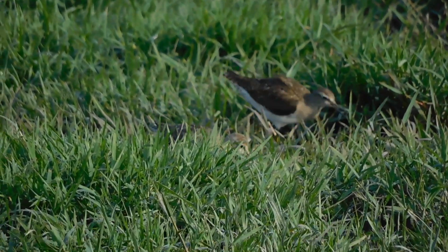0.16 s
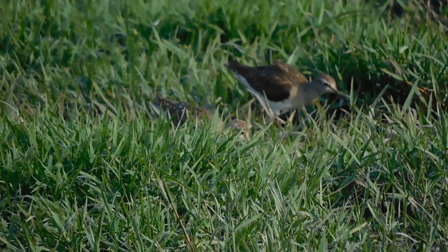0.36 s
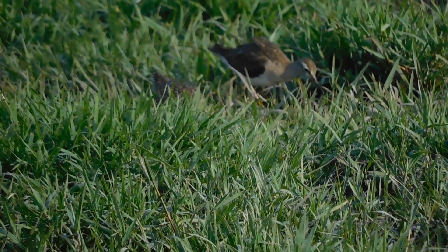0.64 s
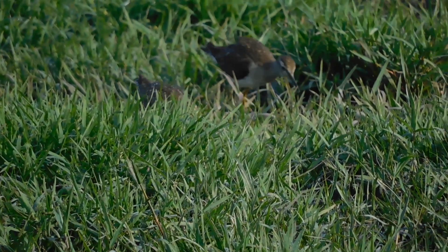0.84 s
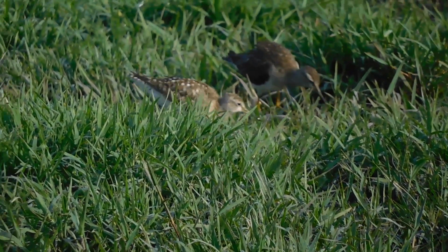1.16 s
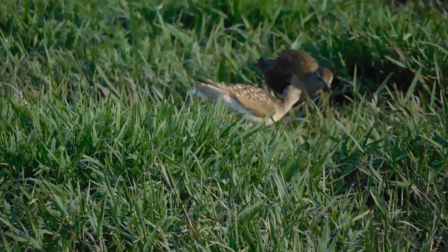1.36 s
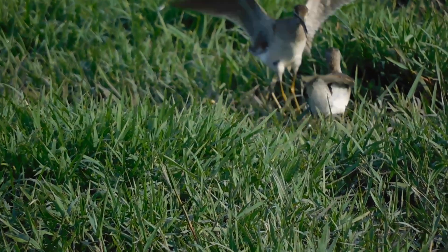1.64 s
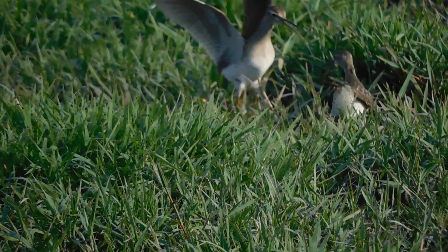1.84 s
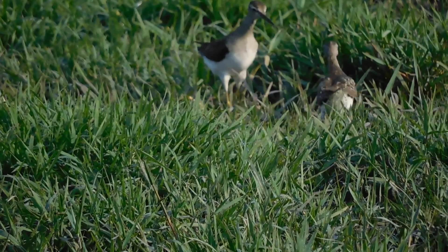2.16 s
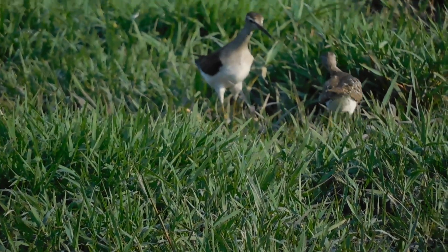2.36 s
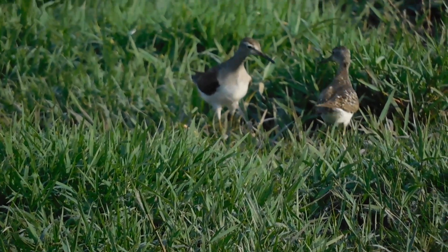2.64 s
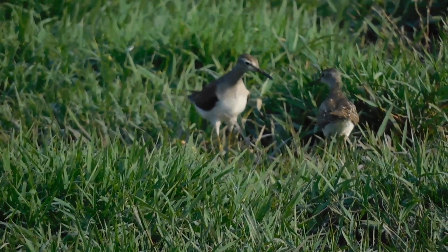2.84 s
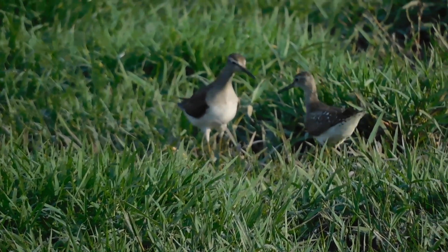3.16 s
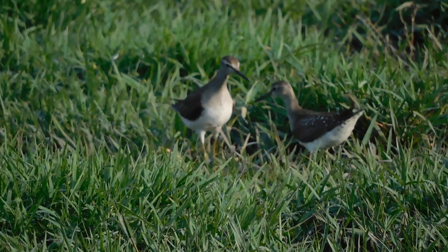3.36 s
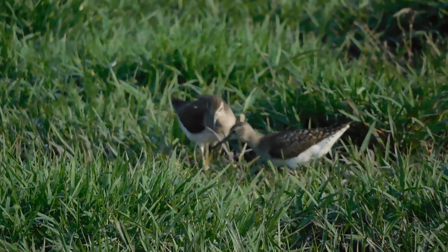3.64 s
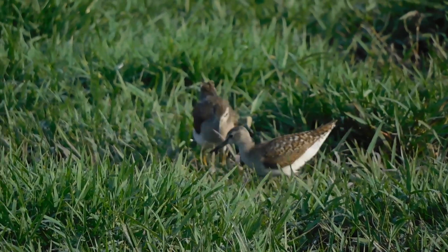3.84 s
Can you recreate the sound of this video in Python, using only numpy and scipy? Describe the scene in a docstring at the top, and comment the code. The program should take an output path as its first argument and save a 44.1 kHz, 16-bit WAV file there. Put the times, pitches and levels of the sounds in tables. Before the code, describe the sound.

Rough wind blasts overload an outdoor stereo microphone at first, then subside. Faint quick bird phrases and a whistling trill, long then short, remain over a far engine hum, followed by one squeak and a falling chirp.

```python
"""Gusts buffet two microphone ports on open grassland, then die away to leave far traffic and an engine's hum.
A small distant bird repeats one quick phrase; a two-toned, whistle-like trill sounds long, then short.
Near the end, over a blur of far-off birds, a closer one squeaks once and another gives a falling chirp.
Wind, roar, hiss and blur are filtered noise or impulses; hum and calls are sines of wavering frequency."""
import sys
import numpy as np
from scipy import signal
from scipy.fft import rfft, irfft
from scipy.io import wavfile
from scipy.ndimage import uniform_filter1d, map_coordinates

SR = 44100
rng = np.random.default_rng(int(sys.argv[2]) if len(sys.argv) > 2 else 0)


def transcribe(u):
    """Save the signal u as a 16-bit wav file named by the first command-line argument.

    u: samples, shape (n,) or (channels, n), limited to [-1, 1]; the rate is SR.
    q: integer samples, one column per channel.
    """
    v = np.clip(np.atleast_2d(u).T, -1, 1)
    q = np.round(v * 32767).astype(np.int16)
    wavfile.write(sys.argv[1], SR, q)


N = 176400

GUST_REF_DB, CALM_DB = -19.5, -77
EDDIES_PER_S = 900
RUMBLE_DB, BUFFET_DB, FIZZ_DB = -24, -21, -60.5  # at the reference gust
RUMBLE_GROWTH, BUFFET_GROWTH, FIZZ_GROWTH = 0.46, 1.11, 0.79  # dB per dB of gust
FIZZ_FLICKER_DB = 3.5
WIND_CEILING = 0.8  # of full scale
ENGINE_HZ = 48.2
HISS_DB = -59
SONG_LAG_S, TRILL_LAG_S, SQUEAK_LAG_S = 0.000037, 0.000019, -0.000078  # right port behind left
SONG_SCATTER_DB, SONG_ECHO_DB = -8, -9
TRILL_SCATTER_DB, TRILL_ECHO_DB = -14, -23
SQUEAK_SCATTER_DB, SQUEAK_ECHO_DB = -15, -17
SCATTER_S, FIELD_T60_S = 0.016, 1  # 1/e time of the scatter, 60 dB decay time of the echo
NOTE_EDGE_S, RELEASE_RATIO = 0.008, 1.6  # attack time, release over attack
PHRASE_VARY_DB = 1.5
TRILL_SIDEBAND_DB = -12
SQUEAK_HISS_DB = -7.5  # relative to the reed
EDGE_HZ = 15850


def amp(db):
    """Level law: 20 dB is a factor of ten in amplitude."""
    return 10 ** (np.asarray(db) / 20)


def unit(x):
    """Normalisation to a root-mean-square of 1."""
    return x / np.sqrt(np.mean(x ** 2) + 1e-20)


def curve(points):
    """Linear interpolation through (s, value), for every sample."""
    return np.interp(np.arange(N) / SR, *np.transpose(points))


def by_hz(points):
    """Interpolation through (Hz, value) on a logarithmic frequency axis, for every bin."""
    f, value = np.transpose(points)
    bins_hz = np.fft.rfftfreq(N, 1 / SR)
    return np.interp(np.log(bins_hz + 1), np.log(f + 1), value)


def colour(x, spectrum):
    """Linear filtering by (Hz, dB) points, scaled to keep the power of white noise."""
    return irfft(rfft(x) * unit(amp(by_hz(spectrum))), N)


def wander(count, rate_hz):
    """Low-passed noise: a smooth random fluctuation, of rms 1 over the whole scene."""
    f = np.fft.rfftfreq(N, 1 / SR)
    low_pass = np.exp(-(f / rate_hz) ** 2)
    return unit(irfft(rfft(rng.standard_normal(N)) * low_pass, N))[:count]


def add(mix, s, sound):
    """Superposition of a sound starting at s seconds, cropped to the mix."""
    at = round(s * SR)
    part = mix[max(at, 0):][:max(len(sound) + min(at, 0), 0)]
    part += sound[max(-at, 0):][:len(part)]


def fade(count, edge_s):
    """Amplitude envelope: soft attack, hold, softer release."""
    t = np.arange(count) / SR
    nearest_edge = np.minimum(t, (t[-1] - t) / RELEASE_RATIO)
    return np.sin(np.pi / 2 * np.clip(nearest_edge / edge_s, 0, 1))


def turns(hz):
    """Phase in radians as the running integral of frequency."""
    return 2 * np.pi * np.cumsum(hz) / SR


def place(x, lag_s, left_db, scatter_db, echo_db):
    """Direction by arrival time and level, with quick ground scatter and a long exponential field echo."""
    f = np.fft.rfftfreq(N, 1 / SR)
    late = irfft(rfft(x) * np.exp(-2j * np.pi * f * lag_s), N)
    direct = np.array([x * amp(left_db / 2), late * amp(-left_db / 2)])
    t = np.arange(SR // 2) / SR
    decays = np.array([np.exp(-t / SCATTER_S), np.exp(-np.log(1000) * t / FIELD_T60_S)])
    tails = rng.standard_normal((2, 2, len(t))) * decays[:, None]  # scatter or echo, port, time
    tails /= np.linalg.norm(tails, axis=2, keepdims=True)
    response = amp(scatter_db) * tails[0] + amp(echo_db) * tails[1]
    return direct + signal.fftconvolve(x[None], response, axes=1)[:, :N]


def eddy_impulses(size_db=3):
    """Shot noise: eddies of random sign and size arrive at random instants."""
    arrivals = rng.random(N) < EDDIES_PER_S / SR
    signs = rng.choice([-1, 1], N)
    return unit(arrivals * signs * amp(size_db * rng.standard_normal(N)))


def wind_port(flutter_db=3, flutter_hz=35):
    """Turbulent pressure at one port: faster air raises its pitch and strong gusts bring a flickering fizz."""
    # Gust strength. Each row: time in seconds, level in dB.
    gust_levels = [(0.0, -42), (0.05, -24), (0.08, -36), (0.1, -18), (0.2, -27), (0.22, -27), (0.25, -15.5),
                   (0.27, -18), (0.35, -39), (0.39, -16), (0.45, -68), (0.47, -63), (0.49, -31), (0.5, -18),
                   (0.52, -18.5), (0.55, -51), (0.57, -25), (0.61, -16.5), (0.63, -22.5), (0.69, -13.5),
                   (0.72, -22.5), (0.81, -16.5), (0.85, -18.5), (0.98, -17.5), (1.0, -8.5), (1.02, -11.5),
                   (1.07, -19.5), (1.09, -16.5), (1.15, -26.5), (1.17, -19), (1.2, -14.5), (1.24, -33),
                   (1.28, -64), (1.31, -24.5), (1.33, -13.5), (1.36, -34), (1.38, -21.5), (1.46, -33),
                   (1.49, -32.5), (1.62, -30.5), (1.64, -35), (1.7, -23), (1.76, -41.5), (1.8, -26),
                   (1.83, -53), (1.85, -36), (1.94, -22), (2.04, -32), (2.06, -40), (2.12, -24),
                   (2.18, -43), (2.21, -37), (2.28, -57), (2.36, -55), (2.4, -77)]
    # Speed at which the sharp eddies pass. Each row: time in seconds, ratio.
    air_speed = [(0, .85), (.3, 1.013), (.55, .85), (.8, 0.99), (1.02, 1.442), (1.18, 0.91), (1.38, 1.1),
                 (1.6, 0.72), (2.2, .8)]
    # Spectra of slow eddies, sharp eddies and fizz. Each row: frequency in Hz, relative level in dB per Hz.
    rumble_spectrum = [(8, -35), (22, -6), (45, 2), (90, 2), (150, -2), (250, -16), (400, -26.5),
                       (800, -37), (2000, -72)]
    buffet_spectrum = [(20, -59), (60, 1), (110, 6.5), (180, 7), (300, 1), (450, -7.5), (700, -24.5),
                       (1200, -45.5), (2500, -76), (6000, -73)]
    fizz_spectrum = [(1000, -10), (3000, -42), (6000, 7), (9000, 10.5), (16000, 9)]

    gust = curve(gust_levels + [(4, CALM_DB)]) - GUST_REF_DB + flutter_db * wander(N, flutter_hz)
    rumble = colour(eddy_impulses() * amp(RUMBLE_DB + RUMBLE_GROWTH * gust), rumble_spectrum)
    # reading the eddies faster or slower shifts their pitch
    passage = np.cumsum(curve(air_speed)) % N
    buffet = map_coordinates(colour(eddy_impulses(), buffet_spectrum), [passage], order=3, mode="wrap")
    buffet *= amp(BUFFET_DB + BUFFET_GROWTH * gust)
    fizz_db = FIZZ_DB + FIZZ_GROWTH * gust + FIZZ_FLICKER_DB * wander(N, 500)
    fizz = colour(rng.standard_normal(N) * amp(fizz_db), fizz_spectrum)
    return rumble + buffet + fizz


def thumps():
    """Pressure doublets: single eddies push then pull, shared between the ports by power."""
    # Each row: centre in seconds, peak in dB, half width in seconds, pan from -1 left to 1 right (clipped).
    eddies = [(0.106, -7.5, 0.00156, -0.12), (.157, -7, 0.0012, -1), (.195, -9, 0.0009, -0.49),
              (.507, -10.5, 0.0017, -0.052), (0.809, -5, 0.0017, -0.5), (0.9639, -8, 0.00083, .2),
              (0.9988, -5, 0.00074, .3), (1.006, -3, 0.00058, 0.025), (1.0602, -3.5, 0.00058, 0.9),
              (1.0645, -.3, .00047, -1), (1.176, -10, 0.0025, -0.65), (1.337, -4.5, 0.00095, -1.4)]
    out = np.zeros((2, N))
    for s, db, width, pan in eddies:
        u = (np.arange(N) / SR - s) / width
        push_pull = -u * np.exp((1 - u ** 2) / 2)
        share = np.sqrt(np.clip([[(1 - pan) / 2], [(1 + pan) / 2]], 0, 1))
        out += share * amp(db) * push_pull
    return out


def wind():
    """Uncorrelated turbulence at each port, softly saturated when strongest, plus hard thumps."""
    turbulence = np.array([wind_port(), wind_port()])
    return WIND_CEILING * np.tanh(turbulence / WIND_CEILING) + thumps()


def roar(swell_db=0.65):
    """Partially coherent noise: far traffic is alike at both ports in the bass and grows slowly."""
    # Spectrum. Each row: frequency in Hz, relative level in dB per Hz.
    roar_spectrum = [(12, -30), (28, -6), (50, -1), (100, -4), (160, -9), (250, -7), (400, -10), (780, -12),
                     (1100, -16), (1660, -19), (2360, -31), (3600, -34), (4900, -45), (15500, -55)]
    # Each row: time in seconds, level in dB.
    roar_levels = [(0, -42.5), (1.3, -41.5), (2.5, -39.5), (3.4, -39.5), (4, -37.5)]
    # Left-right likeness. Each row: frequency in Hz, correlation from 0 to 1.
    likeness = [(60, 0.89), (130, 1), (290, 0.89), (640, 1), (1400, 0.82), (3100, 0.26), (6000, 0)]
    a, b = rfft(rng.standard_normal((2, N)))
    same = np.clip(by_hz(likeness), -1, 1)
    pair = irfft(np.array([a, same * a + np.sqrt(1 - same ** 2) * b]), N)
    return colour(pair, roar_spectrum) * amp(curve(roar_levels) + swell_db * wander(N, 5.3))


def engine_hum(waver=0.00396, flutter_db=2):
    """Harmonic series: engine orders share one wavering shaft speed, each fluttering in level."""
    # Each row: multiple of the shaft frequency, level in dB.
    orders = [(2, -50), (4, -53.5), (5, -48.5), (6, -58), (8, -60.5), (9, -53.5), (11, -61.5)]
    shaft = turns(ENGINE_HZ * (1 + waver * wander(N, 3.05)))
    out = np.zeros(N)
    for k, db in orders:
        level = amp(db + flutter_db * wander(N, 4.5))
        out += np.sqrt(2) * level * np.sin(k * shaft + 2 * np.pi * rng.random())
    return out


def traffic():
    """Level difference between the ports: roar and hum lean left by an amount set by frequency."""
    # Each row: frequency in Hz, left over right in dB.
    left_lead = [(60, 2), (200, 3), (700, 4), (2400, 1.5), (4400, 7.5), (8000, 2)]
    return irfft(rfft(roar() + engine_hum()) * amp(np.outer([0.5, -0.5], by_hz(left_lead))), N)


def hiss():
    """Stationary coloured noise: the microphones' own steady hiss, uncorrelated between the ports."""
    # Each row: frequency in Hz, relative level in dB per Hz.
    hiss_spectrum = [(500, -5), (2500, 0), (4000, 3.5), (5500, 3.5), (9000, 0), (16000, -1.5)]
    return amp(HISS_DB) * colour(rng.standard_normal((2, N)), hiss_spectrum)


def chorus(flicker_db=2):
    """Many unresolved sources sum to band noise: birds too far away to tell apart."""
    # Spectrum. Each row: frequency in Hz, relative level in dB per Hz.
    chorus_spectrum = [(2000, -20), (2900, -6), (3600, -1), (4200, -4), (5200, -20), (7000, -40)]
    # Each row: time in seconds, level in dB.
    chorus_levels = [(0, -71), (2.3, -67), (3.2, -62), (3.6, -59), (4, -63.5)]
    level = amp(curve(chorus_levels) + flicker_db * wander(N, 20))
    return colour(rng.standard_normal((2, N)), chorus_spectrum) * level


def note(length, first_hz, last_hz, db, rasp_hz):
    """Frequency modulation: a gliding whistle roughened by quick random flutter of its pitch."""
    count = int(length * SR)
    flutter = uniform_filter1d(rng.standard_normal(count), size=50)
    flutter = unit(uniform_filter1d(flutter, size=40))
    hz = np.linspace(first_hz, last_hz, count) + rasp_hz * flutter
    return amp(db) * fade(count, NOTE_EDGE_S) * np.sqrt(2) * np.sin(turns(hz))


def song():
    """Repetition with varied stress: each note of the distant bird's phrase shifts a little in level."""
    # Repeats of the phrase. Each row: start in seconds, level in dB.
    phrases = [(-.077, -45), (.243, -45.5), (0.674, -43), (0.967, -44), (1.272, -43.5), (1.676, -44),
               (2.053, -43.5), (2.462, -43)]
    # Each row: start within the phrase and length in seconds, first and last pitch in Hz,
    # level in dB relative to the phrase, rasp in Hz.
    phrase_notes = [(0, .028, 3700, 3640, -16, 25), (.032, .03, 4020, 3890, -12.5, 90),
                    (0.068, .026, 5050, 4800, -9.5, 250), (0.084, 0.024, 5300, 5180, -8, 45),
                    (0.093, 0.024, 5040, 4980, -8, 91), (.109, 0.031, 4180, 4220, -9, 42),
                    (.134, 0.021, 4740, 4684, -6.5, 70), (0.141, 0.018, 4613, 4564, -2.5, 17),
                    (0.162, 0.021, 4630, 4504, -12, 26)]
    out = np.zeros(N)
    for start, db in phrases:
        for s, *shape in phrase_notes:
            stress = amp(db + PHRASE_VARY_DB * rng.standard_normal())
            add(out, start + s, stress * note(*shape))
    out *= fade(N, 0.0022)  # the first phrase is already under way
    return place(out, SONG_LAG_S, left_db=5.5, scatter_db=SONG_SCATTER_DB, echo_db=SONG_ECHO_DB)


def trill():
    """Beating and intermodulation: two close tones interfere and raise weak sidebands."""
    # One table a blast. Each row: time in seconds, upper and lower tone in Hz, upper and lower level in dB.
    blasts = [
        [(1.25, 3225, 3080, -55, -71), (1.284, 3231, 3070, -52, -54), (1.32, 3218, 3080, -62, -50.5),
         (1.374, 3225, 3069, -48, -54.5), (1.464, 3246, 3090, -46, -54), (1.525, 3230, 3070, -57, -49),
         (1.596, 3228, 3086, -48.5, -55), (1.64, 3226, 3047, -51, -61), (1.71, 3226, 3002, -46, -61),
         (1.82, 3220, 3000, -46.5, -58), (1.862, 3245, 3054, -44, -50), (1.874, 3256, 2945, -52, -66)],
        [(2.138, 3260, 3124, -45, -57), (2.162, 3280, 3040, -54, -48), (2.182, 3300, 3000, -49, -54),
         (2.2, 3260, 3020, -51, -65), (2.217, 3250, 3040, -73, -70), (2.228, 3260, 3060, -54, -68),
         (2.26, 3245, 3200, -51.5, -66), (2.3, 3190, 3116, -72, -75)],
    ]
    # Pitch waver in Hz, one value a blast: the short blast is rougher.
    wavers_hz = [16, 55]
    sideband = amp(TRILL_SIDEBAND_DB)
    out = np.zeros(N)
    for blast, waver_hz in zip(blasts, wavers_hz):
        s, *columns = np.transpose(blast)
        t = np.arange(s[0], s[-1], 1 / SR)
        upper_hz, lower_hz, upper_db, lower_db = [np.interp(t, s, c) for c in columns]
        upper = turns(upper_hz + waver_hz * wander(len(t), 256))
        lower = turns(lower_hz + waver_hz * wander(len(t), 256))
        tones = amp(upper_db) * (np.sin(upper) + sideband * np.sin(2 * upper - lower))
        tones += amp(lower_db) * (np.sin(lower) - sideband * np.sin(2 * lower - upper))
        add(out, s[0], np.sqrt(2) * tones * fade(len(t), 0.0047))
    return place(out, TRILL_LAG_S, left_db=10.5, scatter_db=TRILL_SCATTER_DB, echo_db=TRILL_ECHO_DB)


def squeak():
    """Source and filter: a nearby bird's rough reed through a fixed throat breaks upward halfway."""
    # Two notes. Each row: start and length in seconds, first and last pitch in Hz,
    # first and last level in dB, rasp in Hz.
    squeak_notes = [(3.407, 0.045, 1347, 1498, -42, -33, 25), (3.445, .035, 1940, 1836, -39, -39.5, 40)]
    # Throat response. Each row: frequency in Hz, relative level in dB.
    throat = [(1500, -15), (1950, -19), (2750, -0.5), (3050, 2), (3750, -3.5), (4200, -4), (5400, -10),
              (7600, -19), (9500, -27), (13000, -35)]
    # Air through the reed. Each row: frequency in Hz, relative level in dB per Hz.
    air_spectrum = [(1200, -28), (2500, 5), (4000, 4), (5800, 2), (9000, -23), (15000, -25)]
    out = np.zeros(N)
    for s, length, first_hz, last_hz, first_db, last_db, rasp_hz in squeak_notes:
        count = int(length * SR)
        hz = np.linspace(first_hz, last_hz, count)
        phase = turns(hz + rasp_hz * wander(count, 600))
        reed = np.zeros(count)
        for k in range(1, 8):
            reed += amp(np.interp(k * hz, *np.transpose(throat))) * np.sin(k * phase)
        air = amp(SQUEAK_HISS_DB) * colour(rng.standard_normal(N), air_spectrum)[:count]
        level = amp(np.linspace(first_db, last_db, count)) * fade(count, 0.003)
        add(out, s, (unit(reed) + air) * level)
    return place(out, SQUEAK_LAG_S, left_db=0.2, scatter_db=SQUEAK_SCATTER_DB, echo_db=SQUEAK_ECHO_DB)


def chirps():
    """Frequency glides: stray notes of other birds, a faint long one and then a falling chirp."""
    # Each row: start and length in seconds, first and last pitch in Hz, level in dB, rasp in Hz.
    chirp_notes = [(3.575, 0.19, 3510, 3520, -62, 69), (3.908, 0.02, 6500, 5650, -50, 300),
                   (3.927, .016, 5700, 4900, -42, 70), (3.937, .015, 5200, 5200, -44, 90),
                   (3.941, .012, 4780, 4140, -47, 200), (3.96, 0.03, 6080, 6150, -53, 50)]
    out = np.zeros(N)
    for s, *shape in chirp_notes:
        add(out, s, note(*shape))
    return place(out, SONG_LAG_S, left_db=2.0, scatter_db=SONG_SCATTER_DB, echo_db=SONG_ECHO_DB)


def scene():
    """Linear superposition of all sources at the two ports."""
    return wind() + traffic() + hiss() + chorus() + song() + trill() + squeak() + chirps()


def record(dry):
    """Clipping at full scale, then a linear-phase low-pass that limits the band."""
    low_pass = signal.firwin(511, EDGE_HZ, window=("kaiser", 9), fs=SR)
    return signal.oaconvolve(np.clip(dry, -1, 1), low_pass[None], "same")


dry = scene()
out = record(dry)
transcribe(out)
```